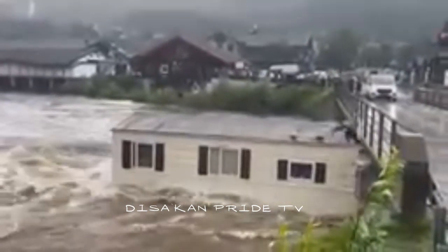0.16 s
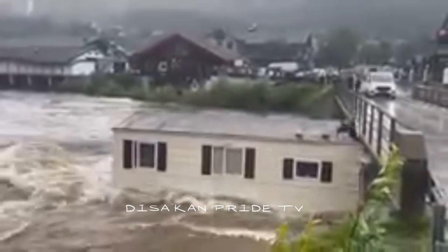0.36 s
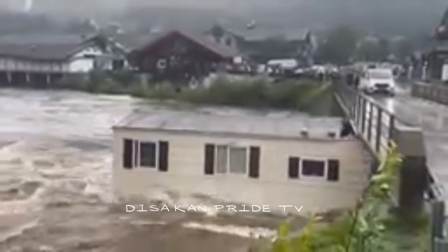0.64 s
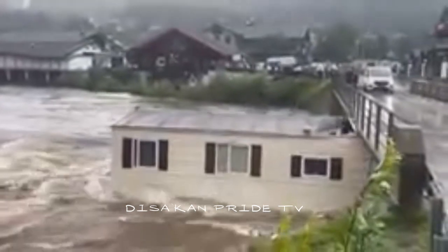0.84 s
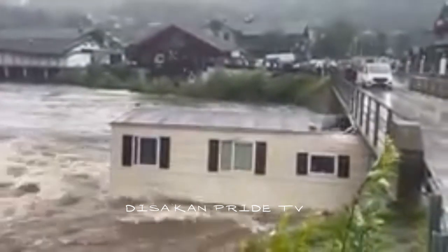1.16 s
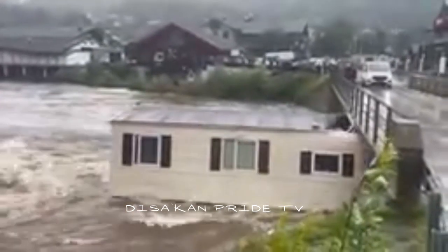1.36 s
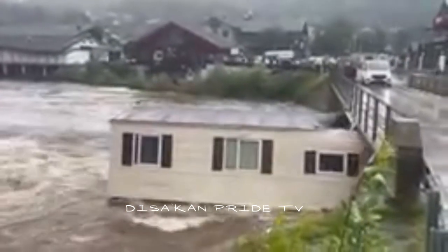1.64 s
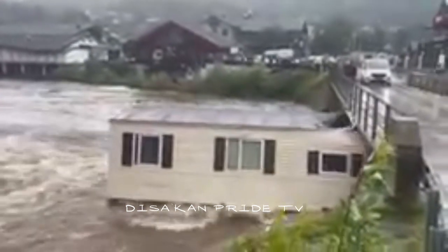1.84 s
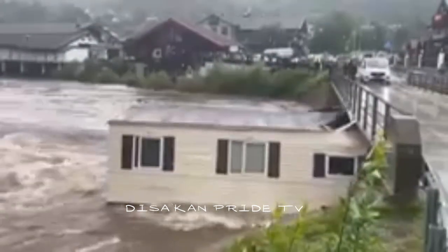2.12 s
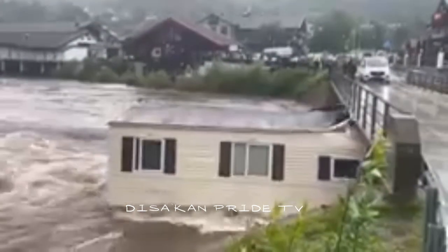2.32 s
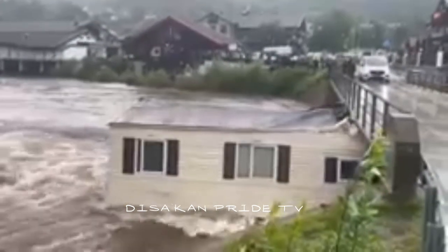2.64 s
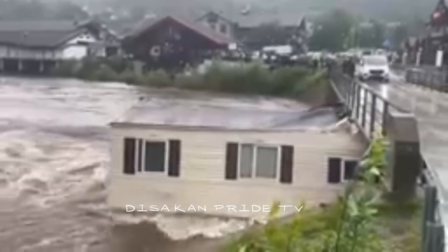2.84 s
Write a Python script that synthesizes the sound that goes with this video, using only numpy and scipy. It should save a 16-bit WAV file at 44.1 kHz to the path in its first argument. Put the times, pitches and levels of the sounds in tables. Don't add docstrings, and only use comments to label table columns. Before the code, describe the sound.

Deep rushing river flood with soft spray hiss, dull thuds, and a cabin lightly knocking and crumpling

```python
import sys
import numpy as np
from scipy import signal
from scipy.fft import rfft, irfft, next_fast_len
from scipy.io import wavfile
from scipy.ndimage import uniform_filter1d, map_coordinates

SR = 44100
rng = np.random.default_rng(int(sys.argv[2]) if len(sys.argv) > 2 else 0)


def to_wav(sig):
    pcm = np.clip(np.atleast_2d(sig), -1, 1) * 32767
    pcm = np.round(pcm).astype(np.int16)
    wavfile.write(sys.argv[1], SR, pcm.T)


def rack_gain(trim_db):
    fader = np.asarray(trim_db, float)
    return 10 ** (fader / 20)


N = 131418

# time in seconds, level in dB, share of the deepest thud in dB.
SURGE = [(0, -39, -4), (.2, -38, 0), (.35, -39, -7), (.53, -36.5, -3), (.6, -32, -6), (.75, -34.5, -16),
         (.85, -32.5, -3), (1.0, -33.5, -2), (1.15, -35, -12), (1.26, -34, -9), (1.42, -35, -6),
         (1.6, -34.5, -11), (1.77, -35.5, -1), (1.97, -37, -11), (2.3, -38.5, -10), (2.68, -37, -6),
         (2.85, -37.5, -10), (2.98, -39, -4)]
# time in seconds, level in dB.
SPRAY = [(0.0, -45), (.35, -45), (.62, -42.5), (0.76, -43.5), (.9, -46), (1.07, -45.5), (1.3, -44.5),
         (1.53, -44), (1.75, -44), (1.93, -44), (2.15, -45.5), (2.3, -44.5), (2.48, -44.5), (2.6, -42),
         (2.8, -45.5), (2.9, -45), (2.98, -49.5)]
# frequency in Hz, level in dB.
ROAR_COLOUR = [(30, -52), (70, -4.5), (100, -2.5), (170, -0.5), (260, -4), (450, -9), (800, -23),
               (2000, -73)]
# frequency in Hz, level in dB.
THUD_COLOUR = [(20, -34), (40, -9.5), (62, -0.5), (85, -3.5), (130, -26), (300, -74)]
# frequency in Hz, level in dB.
WASH_COLOUR = [(150, 1), (400, -4.5), (1100, 1.5), (2500, -5.5), (5000, -12), (7000, -20), (12500, -18),
               (15500, -35)]
# frequency in Hz, level in dB.
TEAR_COLOUR = [(200, -23.5), (600, -7.5), (1100, -7), (3000, -3.5), (5000, -8), (7000, -16), (12500, -19),
               (15500, -36)]
# start in seconds, peak in dB, pitch in Hz.
SLAMS = [(.10, -28, 68.5), (.215, -29, 61), (.319, -31, 67.5), (.577, -23, 63), (.805, -26, 87),
         (.875, -26.5, 97), (.952, -25, 78.5), (1.07, -25.5, 92), (1.242, -23, 65), (1.29, -30, 63.5),
         (1.414, -25.5, 74), (1.47, -28, 80), (1.744, -26, 101.2), (1.91, -30, 62.4), (2.95, -31, 70),
         (.376, -28.5, 167), (.461, -30.5, 199), (.553, -27.5, 238), (.738, -29, 242.5), (.802, -28, 183),
         (1.015, -29, 298.6), (1.198, -27, 183), (1.265, -25.5, 220.6), (1.571, -30, 225),
         (1.6, -27.5, 150.4), (1.858, -28, 149), (2.025, -28, 146), (2.16, -32.5, 178), (2.25, -30, 191),
         (2.53, -29, 137), (2.672, -27, 141), (2.79, -31, 139), (2.9, -32, 129), (.62, -33, 320),
         (1.63, -30.5, 70.4), (.16, -37, 129.4), (.69, -34, 69), (1.22, -35.5, 354.4), (.29, -29.5, 159),
         (.07, -34, 248.5), (2.13, -33, 260), (1.44, -31, 160), (1.33, -31, 170)]
# start in seconds, peak in dB, pitch in Hz.
KNOCKS = [(.039, -30, 980), (.064, -33, 853), (.209, -30, 1093), (.619, -26, 310), (.868, -40, 420),
          (1.226, -29.5, 272), (1.514, -35.5, 967), (1.582, -40, 300), (2.028, -31, 391), (2.365, -31, 850),
          (2.385, -44, 910), (2.405, -30.5, 855), (2.413, -28, 423), (1.3, -34, 804), (.76, -35, 1030),
          (1.0, -35, 956), (2.445, -30.5, 994), (2.707, -31.5, 987), (.885, -31, 770)]
# start in seconds, peak in dB.
SPITS = [(0.4254, -38), (0.4738, -41), (0.4913, -39), (0.629, -38), (0.7936, -54), (0.854, -46),
         (0.9662, -40), (0.9887, -40), (1.066, -40), (1.1079, -42), (1.1523, -38), (1.3887, -47),
         (1.4107, -46), (1.5194, -45), (1.6132, -38), (1.85, -44), (2.0073, -41), (2.361, -40),
         (2.6615, -51)]
# start in seconds, peak in dB, pitch in Hz.
TICKS = [(0.1501, -30.5, 4200), (.4254, -53, 6030), (0.4816, -31.5, 3000), (.9887, -36, 3900),
         (1.1079, -39, 4000), (1.1528, -32.5, 5050), (1.213, -38.5, 5600), (1.275, -39, 4500),
         (1.3803, -35, 4200), (1.6608, -32, 2790), (1.694, -35.5, 4000), (1.8267, -37, 3500),
         (2.6596, -32, 4000), (.0263, -35.5, 2700), (.1715, -35, 3310), (.5252, -45, 2160),
         (.9707, -35, 2900), (2.0113, -38, 1620), (2.8878, -44, 1680)]
# start in seconds, peak in dB, pitch in Hz.
PINGS = [
    (.2184, -35, 3360),
    (.4369, -38, 5090),
    (.5781, -30.5, 4020),
    (.655, -29, 2770),
    (1.5708, -27.5, 2950),
    (1.6132, -24, 2810),
    (2.0837, -26.5, 2934),
    (2.218, -30, 2240),
    (2.2847, -29.5, 2950),
]
# start in seconds, length in seconds, level in dB, brightness in dB per octave.
CRUNCHES = [(0.158, 0.04, -48, 11), (0.199, 0.053, -39, -0.5), (0.422, 0.067, -46.5, -1.5),
            (0.47, 0.025, -43, -2.5), (0.619, 0.063, -34, -3), (0.856, 0.038, -20, -5.5),
            (0.964, .04, -33, -4.5), (1.372, 0.018, -39.5, 1), (1.508, 0.017, -39.5, -0.5),
            (1.572, 0.062, -39.5, -1.5), (1.82, 0.028, -41.5, 0), (1.988, 0.17, -39, 0),
            (2.195, 0.064, -46, 4), (2.27, 0.093, -41, 2), (2.341, 0.16, -39.5, 1.5),
            (2.411, 0.043, -48.5, 2), (2.64, 0.091, -37.5, 4), (2.76, 0.11, -52.5, 5),
            (2.863, 0.12, -41.5, 1)]
# frequency in Hz, width in Hz, depth in dB (negative is a bump).
DIPS = [(1378, 110, 12), (1952, 107, 7), (2510, 147, 3.5), (3500, 146, 6), (4200, 110, 1.5),
        (4620, 130, -2), (4820, 47, 3), (5600, 136, 4.5), (6020, 124, 3.5), (8754, 680, 24),
        (15400, 400, 5), (123, 6.8, -1.5)]


def unit(x):
    return x / np.sqrt(np.mean(x ** 2) + 1e-20)


def curve(rows):
    s, *cols = np.transpose(rows)
    return [np.interp(np.arange(N) / SR, s, c) for c in cols]


def wobble(rate):
    knots = rng.standard_normal(int(N * rate / SR) + 4)
    return map_coordinates(knots, [np.arange(N) * rate / SR])


def coloured(x, gain_db):
    size = next_fast_len(len(x) + 8192)
    hz = np.fft.rfftfreq(size, 1 / SR) + 1
    return irfft(rfft(x, size) * rack_gain(gain_db(hz)), size)[:len(x)]


def along(points):
    f, db = np.transpose(points)
    return lambda hz: np.interp(np.log(hz), np.log(f), db)


def patchy(depth_db):
    z = signal.stft(rng.standard_normal(N), nperseg=512)[2]
    field = uniform_filter1d(rng.standard_normal(z.shape), 8, 0)
    field = uniform_filter1d(field, 7, 1)
    return signal.istft(z * rack_gain(depth_db * unit(field)), nperseg=512)[1][:N]


def grains(count, hz, spread, cycles, spike_db):
    at, pitch, size = rng.random((count, 3)).T
    start = (at * N).astype(int)[:, None]
    f = np.clip(hz * np.exp(spread * (2 * pitch - 1)), 100, 15000)[:, None]
    k = np.arange(256)
    level = rack_gain(-spike_db * np.log(size + 0.022))[:, None]
    wave = level * np.sin(2 * np.pi * f * k / SR) * np.exp(-k * f / (SR * cycles))
    return unit(np.bincount((start + k).ravel(), wave.ravel(), N + 256)[:N])


def strikes(rows, t60, rise_s, hiss):
    out, t = np.zeros(N + SR), np.arange(SR // 4) / SR
    for s, db, hz in rows:
        near = lambda f: 0.5 * along(TEAR_COLOUR)(f) - 9 * np.abs(np.log2(f / hz)) ** 1.9
        noise = unit(coloured(rng.standard_normal(len(t)), near))
        ring = (np.sin(2 * np.pi * hz * t) + hiss * noise) / np.hypot(1, hiss)
        envelope = rack_gain(db + 4 - 60 * t / t60) * (1 - np.exp(-t / rise_s))
        out[round(s * SR):][:len(t)] += envelope * ring
    return out[:N]


def deep_water():
    surge_db, deep_db = curve(SURGE)
    roar_db, thud_db = -1.5, -1.5
    roar = coloured(patchy(depth_db=0.84), along(ROAR_COLOUR))
    roar = unit(rack_gain(0.25 * wobble(14)) * roar)
    thud = coloured(rng.standard_normal(N), along(THUD_COLOUR))
    thud = unit(rack_gain(0.31 * wobble(13.6)) * thud)
    return rack_gain(surge_db) * (rack_gain(roar_db) * roar + rack_gain(deep_db + thud_db) * thud)


def spray_wash():
    wash_db, fizz_db = 5.5, -15
    fizz = grains(count=2500, hz=4000, spread=1.42, cycles=2.4, spike_db=4.5)
    wash = coloured(unit(patchy(depth_db=2)) + rack_gain(fizz_db) * fizz, along(WASH_COLOUR))
    wash = unit(rack_gain(0.14 * wobble(7.93) + 0.63 * wobble(30.39)) * wash)
    return rack_gain(curve(SPRAY)[0] + wash_db) * wash


def wave_slams():
    return strikes(SLAMS, t60=0.16, rise_s=0.019, hiss=0)


def hull_knocks():
    return strikes(KNOCKS, t60=0.065, rise_s=0.005, hiss=1.0)


def ticks():
    spits = [(s, db - 1, 11760) for s, db in SPITS]
    return strikes(TICKS + spits, t60=0.013, rise_s=0.00069, hiss=2.4)


def metal_pings():
    return strikes(PINGS, t60=0.022, rise_s=0.0021, hiss=0.55)


def crumpling_panels():
    rise, span = 0.38, 1.86
    out = np.zeros(N + SR)
    lumps = rack_gain(2 * wobble(90))
    snaps = grains(count=9000, hz=3000, spread=1.336, cycles=1.4, spike_db=3.5)
    crackle = lumps * (rng.standard_normal(N) + 0.54 * snaps)
    for s, length, db, tilt in CRUNCHES:
        start = round(s * SR)
        u = np.arange(round(span * length * SR)) / (length * SR)
        shape = np.clip(u / rise, 0, 1) * np.clip((span - u) / 1.26, 0, 1)
        tone = lambda hz: along(TEAR_COLOUR)(hz) + tilt * np.log2(hz / 2500)
        piece = unit(coloured(crackle[start:][:len(u)], tone))
        out[start:][:len(piece)] += rack_gain(db) * piece * shape[:len(piece)]
    return out[:N]


def scene():
    river = deep_water() + spray_wash()
    hull = wave_slams() + hull_knocks()
    small = ticks() + metal_pings()
    return (river + hull + small + crumpling_panels())[None]


def band_limit(x):
    return signal.sosfilt(signal.butter(12, 15720, fs=SR, output="sos"), x)


def record(dry):
    low_cut_hz, top_hz = 40, 15720
    dips = lambda hz: -sum(db * np.exp(-0.5 * ((hz - c) / w) ** 2) for c, w, db in DIPS)
    edges = lambda hz: -10 * np.log10(1 + (low_cut_hz / hz) ** 8) - 60 * (hz > top_hz)
    heard = coloured(dry[0], lambda hz: dips(hz) + edges(hz))
    return band_limit(heard[None])


dry = scene()
out = record(dry)
to_wav(out)
```